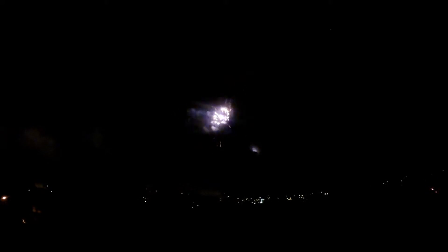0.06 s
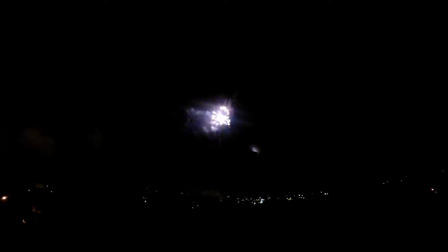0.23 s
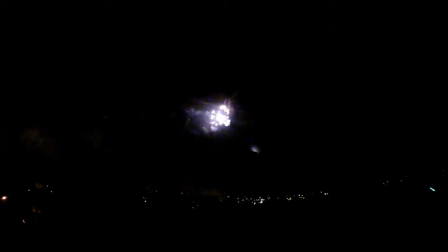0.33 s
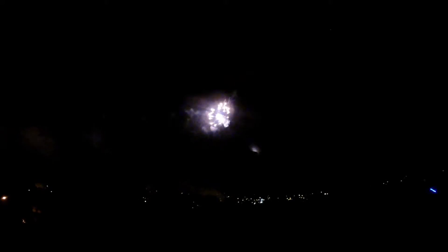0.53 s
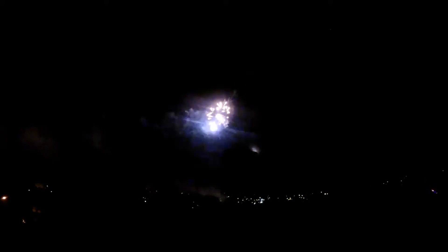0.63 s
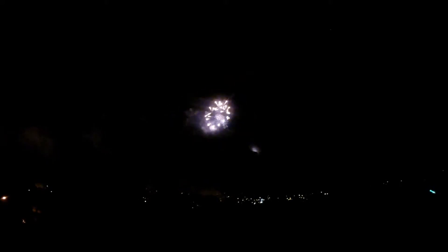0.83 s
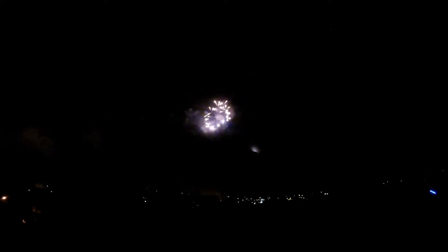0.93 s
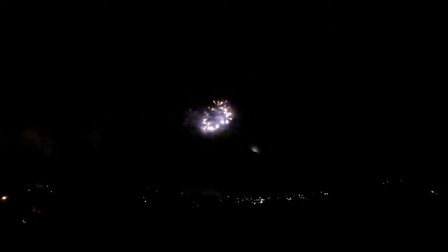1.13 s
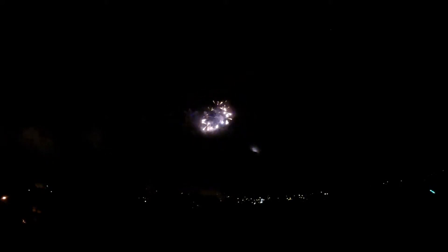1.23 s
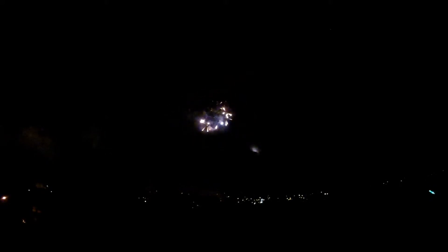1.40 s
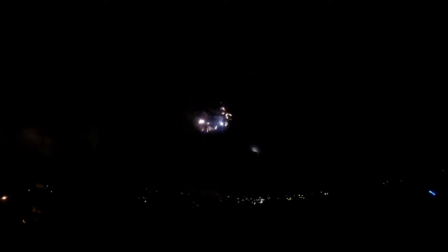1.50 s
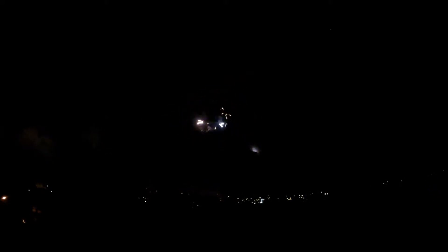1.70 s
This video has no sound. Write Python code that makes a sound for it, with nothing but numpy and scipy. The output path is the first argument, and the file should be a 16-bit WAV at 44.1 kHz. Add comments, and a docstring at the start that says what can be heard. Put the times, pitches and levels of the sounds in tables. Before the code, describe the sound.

Fireworks at night: two hard sharp cracks, two deeper booms right after, a long echo over the town, then a thick burst of crackling stars with two pops, heard outdoors from a distance.

```python
"""Firework shells over a town at night, above a quiet murmur that lasts throughout.
First come two sharp reports, then two deep booms, then a cloud of crackling stars with two more pops.
Each shell is a filtered click with its bounce and a short thump of air; each star is a small click.
Nearby surfaces smear every click with brief noise. A wall and the town answer with fading noise,
which makes the long echo."""
import sys
import numpy as np
from scipy import signal
from scipy.fft import rfft, irfft
from scipy.io import wavfile

SR = 44100
rng = np.random.default_rng(int(sys.argv[2]) if len(sys.argv) > 2 else 0)


def master(y):
    """Save y as 16-bit WAV."""
    cut = np.clip(np.atleast_2d(y).T, -1, 1)
    pcm = np.round(cut * 32767)  # scale
    wavfile.write(sys.argv[1], SR, pcm.astype(np.int16))


N = 77175  # length [samples]
T = np.arange(N) / SR  # time of each sample [s]
HZ = np.arange(N + 1) * SR / (2 * N)  # frequency of each spectrum line [Hz]

# Night murmur: balance of low and high (frequency [Hz], relative level [dB])
NIGHT_BALANCE = [(25, -5), (60, -5), (130, -7), (240, -6.5), (450, -14.5), (900, -17), (1600, -22),
                 (2100, -22), (2900, -25), (4200, -29.5), (6200, -31.5), (8000, -38), (15000, -44.5)]
NIGHT_DB = -53.5  # overall level, relative to full scale

# Town echo by pitch band (centre [Hz], level [dB], time to fade by 60 dB [s])
TOWN_BANDS = [(44.6, -17, 1.1), (82, -10.5, 1.9), (134, -12, 1.5), (230, -26.5, 2.3), (463, -10.5, 5.85),
              (890, -13, 2.8), (1480, -10.5, 3.5), (1900, -14, 3), (2710, -8, 2.65), (3530, -15.5, 2.7),
              (6150, -17, 2.3), (8240, -25, 0.69), (14000, -40, 0.83)]
TOWN_RISE_S, PATCH_SPACING_S, PATCH_SPREAD_DB = 0.004, 0.021, 2
NEAR_ECHO_DB, NEAR_ECHO_DECAY_S, NEAR_ECHO_TOP_HZ = -15, 0.019, 3440

# A wall a little farther off than the closest surfaces
WALL_DELAY_S, WALL_DECAY_S, WALL_DB, WALL_TOP_HZ = 0.015, 0.0031, -13.5, 4830

# Colour that blasts and stars take on at the listening spot (frequency [Hz], gain [dB])
SPOT_COLOUR = [(80, -5), (170, -5), (270, 0), (420, -9), (560, 9), (680, 13.5), (800, 11), (1060, 10),
               (1230, -1.5), (1400, 12), (1640, 13), (1870, -7.5), (2030, 2), (2200, -9), (2400, 10.5),
               (2650, -1.5), (2900, 4.5), (3120, 6), (3400, -5.5), (3730, 2), (4000, -14), (4300, -7),
               (4900, -2), (5450, -6), (6300, -13.5), (6900, -9), (7600, -24), (8500, -19), (9100, -14),
               (15000, -53)]
ECHO_COLOUR_SHARE = 0.45  # echoes come from all sides and keep only this share of the colour's dB

# Scatter off surfaces close by
SCATTER_DECAY_S, SCATTER_LOW_HZ = 0.0022, 935

# Single crackling stars (time [s], level before colour [dB])
SINGLE_STARS = [(1.1814, -14.5), (1.2032, -17.5), (1.2156, -16.5), (1.2202, -13), (1.2378, -17),
                (1.2425, -22), (1.2526, -15), (1.2584, -13), (1.2734, -12), (1.2784, -13.5),
                (1.2874, -17.5), (1.2961, -11), (1.3, -39), (1.3092, -16), (1.3176, -13), (1.329, -7),
                (1.3324, -21), (1.3404, -22), (1.3436, -5.5), (1.3602, -25), (1.3683, -9.5), (1.378, -15.5),
                (1.3909, -11), (1.3953, -15), (1.4039, -11), (1.423, -16.5), (1.4305, -19), (1.4386, -26),
                (1.4461, -12), (1.456, -14), (1.462, -10), (1.489, -17), (1.499, -13.5), (1.5174, -13),
                (1.5239, -13), (1.5326, -11.5), (1.5490, -9.5), (1.5690, -20), (1.5768, -11.5),
                (1.58, -12.5), (1.6096, -14), (1.623, -16.5), (1.6280, -20.5), (1.6399, -12), (1.654, -13)]
# Thick of the crackle (time [s], rate [stars per s], middle level of one star before colour [dB])
STAR_SWARM = [(1.32, 81, -16), (1.35, 200, -13.5), (1.40, 220, -12.5), (1.47, 220, -15), (1.52, 170, -16.5),
              (1.56, 110, -18), (1.595, 91, -14.5)]
STAR_LOW_HZ, STAR_HIGH_HZ, STAR_SCATTER_DB = 1646, 5770, -2.5
STAR_SPREAD_DB = 4  # a swarm star is up to this much louder or softer
STAR_AIR_HZ = 5870  # air takes the top off the small snaps
STAR_ECHO_DB = -3.5  # how strongly stars feed the echo

# Shell blasts, levels before colour (time [s], crack level [dB], low edge [Hz], high edge [Hz],
# bounce lag [ms], bounce share [fraction of crack], scatter relative to front [dB],
# thump pitch [Hz], thump level [dB], echo feed [dB])
SHELL_BLASTS = [(0.2021, 10.5, 570, 6950, 1.296, 0.1, -3.5, 215, -3.5, -1.5),
                (0.2512, 1.5, 307, 6200, 1.15, 0.16, -0.5, 213, -16, -6),
                (0.4014, -18, 405, 1400, 0.94, 0.17, 8, 87.4, -39.5, 3),
                (0.4068, 3.5, 537, 1430, 1.82, 0.44, -9, 70.4, -19, 5.5),
                (.4520, -17, 665, 1940, 1.37, 0.2, 3.5, 93, -55, 19.5),
                (.4686, 2.5, 377, 940, 1.59, 1, 0, 72, -16, 2),
                (1.4718, -11.5, 1090, 3560, 1.12, 0.42, 8.5, 212, -53, -4),
                (1.4761, -0.5, 970, 3500, 1.775, 0.47, -7.5, 187, -28.5, 4.5),
                (1.6860, -5.5, 1100, 4670, 3.9, .15, 1, 203, -34, -6)]
THUMP_DECAY_CYCLES = 0.6
THUMP_TOP_RATIO = 2.98  # top edge as a multiple of the pitch

OVERLOAD = 0.78  # level at which the microphone gives out
RECORDER_TOP_HZ = 15300


def undb(db):
    """Turn decibels into a gain."""
    return 10 ** (np.asarray(db) / 20)


def spectrum(x):
    """Split a sound into frequencies, with room for tails."""
    return rfft(x, 2 * N)


def sound(spec):
    """Turn a spectrum back into sound."""
    return irfft(spec, 2 * N)[:N]


def curve(points):
    """Gain at every frequency, drawn through (frequency [Hz], gain [dB]) points."""
    hz, db = np.array(points).T
    return undb(np.interp(np.log(HZ + 1), np.log(hz), db))


def causal(gain):
    """Filter response with this gain that rings only after the blow."""
    cepstrum = irfft(np.log(gain))
    # Fold the half before the blow onto the half after it
    cepstrum[1:N] *= 2
    cepstrum[N + 1:] = 0
    return np.exp(rfft(cepstrum))


def edge(x, hz, kind, order=2):
    """Cut away the highs ("low") or the lows ("high") beyond hz."""
    return signal.sosfilt(signal.butter(order, hz, kind, fs=SR, output="sos"), x)


def unit(x):
    """Scale to an energy of one."""
    return x / np.sqrt(np.sum(x ** 2))


def delay(x, s):
    """The same sound, s seconds later."""
    return np.concatenate([np.zeros(int(s * SR)), x])[:N]


def add(out, x, s):
    """Mix a short sound in at s seconds."""
    start = int(np.clip(s * SR, 0, N - 1))
    out[start:start + len(x)] += x[:N - start]


def night():
    """Steady murmur of distant streets and air: noise with a fixed balance of low and high."""
    noise = spectrum(rng.standard_normal(2 * N))
    murmur = unit(sound(noise * curve(NIGHT_BALANCE)))
    return undb(NIGHT_DB) * np.sqrt(N) * murmur


def spray(decay_s, size=N):
    """A dying spray of small reflections, made of fading noise."""
    return unit(rng.standard_normal(size) * np.exp(-T[:size] / decay_s))


def town():
    """How the town answers a click: patchy echoes from many house fronts, each band fading at its own rate."""
    patches = np.interp(T / PATCH_SPACING_S, np.arange(N), rng.standard_normal(N))
    noise = spectrum(rng.standard_normal(N) * undb(PATCH_SPREAD_DB * patches))
    centres = np.log([row[0] for row in TOWN_BANDS])
    response = np.zeros(N)
    # Each pick is one at its own band and zero at the rest, so neighbours cross-fade
    for pick, (hz, db, t60) in zip(np.eye(len(TOWN_BANDS)), TOWN_BANDS):
        band = sound(noise * np.interp(np.log(HZ + 1), centres, pick))
        fade = np.exp(-np.log(1000) * T / t60)
        rise = 1 - np.exp(-T / TOWN_RISE_S)
        response += undb(db) * band * unit(fade * rise)
    near = unit(edge(spray(NEAR_ECHO_DECAY_S), NEAR_ECHO_TOP_HZ, "low", order=1))
    return response + undb(NEAR_ECHO_DB) * near


def wall():
    """How the wall answers a click: a short, dulled spray that arrives a moment later."""
    reflections = delay(spray(WALL_DECAY_S), WALL_DELAY_S)
    return edge(undb(WALL_DB) * reflections, WALL_TOP_HZ, "low")


def crack(low_hz, high_hz, scatter_db, size=2048):
    """A shock front, thinner from a small charge and duller from afar, with its scatter off close surfaces."""
    front = signal.unit_impulse(size)
    rise = 1 - np.exp(-2 * T[:size] / SCATTER_DECAY_S)
    scatter = unit(edge(spray(SCATTER_DECAY_S, size) * rise, SCATTER_LOW_HZ, "high"))
    shock = front + undb(scatter_db) * scatter
    return edge(edge(shock, low_hz, "high"), high_hz, "low")


def star(db):
    """One star's snap: a small crack with little bass."""
    return undb(db) * crack(STAR_LOW_HZ, STAR_HIGH_HZ, STAR_SCATTER_DB)


def crackle():
    """Stars snap one by one, thicken into a swarm and thin out again; air dulls them all."""
    out = np.zeros(N)
    for s, db in SINGLE_STARS:
        add(out, star(db), s)
    when, rate, level_db = np.array(STAR_SWARM).T
    burnt = np.cumsum(np.interp(T, when, rate, left=0, right=0)) / SR  # swarm stars so far
    for k in range(int(burnt[-1])):
        early, strength = rng.random(2)
        s = np.searchsorted(burnt, k + early) / SR
        spread_db = STAR_SPREAD_DB * (2 * strength - 1)
        add(out, star(np.interp(s, when, level_db) + spread_db), s)
    return edge(out, STAR_AIR_HZ, "low", order=4)


def thump(hz):
    """The push of air behind the front: the slope of a quickly dying swing."""
    cycles = hz * T
    swing = np.sin(2 * np.pi * cycles) * np.exp(-cycles / THUMP_DECAY_CYCLES)
    push = np.diff(swing, prepend=0) * SR / (2 * np.pi * hz)
    return edge(push, THUMP_TOP_RATIO * hz, "low")


def shells(colour, echo_colour):
    """Each shell cracks, bounces off the ground and thumps; returns the direct sound and the echo feed."""
    direct, echo_feed = np.zeros(N), np.zeros(N)
    for (s, db, low_hz, high_hz, lag_ms, share, scatter_db,
         thump_hz, thump_db, echo_db) in SHELL_BLASTS:
        shock = undb(db) * crack(low_hz, high_hz, scatter_db)
        front = np.zeros(N)
        add(front, shock, s)
        add(front, share * shock, s + lag_ms / 1000)  # bounce
        push = undb(thump_db) * delay(thump(thump_hz), s)
        blast = spectrum(front + push)
        direct += sound(blast * colour)
        echo_feed += undb(echo_db) * sound(blast * echo_colour)
    return direct, echo_feed


def scene():
    """Shells and stars, their echoes and the night."""
    background = night()
    surroundings = spectrum(town() + wall())
    spot_gain = curve(SPOT_COLOUR)
    colour, echo_colour = causal(spot_gain), causal(spot_gain ** ECHO_COLOUR_SHARE)
    stars = spectrum(crackle())
    blasts, echo_feed = shells(colour, echo_colour)
    direct = blasts + sound(stars * colour)
    echo_feed += undb(STAR_ECHO_DB) * sound(stars * echo_colour)
    echoes = sound(spectrum(echo_feed) * surroundings)
    # The minus signs turn the blasts and echoes upside down
    return (background - direct - echoes)[None]


def record(dry):
    """The recorder rounds the tallest peaks, then cuts the top."""
    rounded = dry / (1 + (dry / OVERLOAD) ** 4) ** (1 / 4)
    # Steep cut: order 8, 0.2 dB ripple below the edge, 70 dB down above it
    top_cut = signal.ellip(8, 0.2, 70, RECORDER_TOP_HZ, fs=SR, output="sos")
    return signal.sosfilt(top_cut, rounded)


dry = scene()
out = record(dry)
master(out)
```